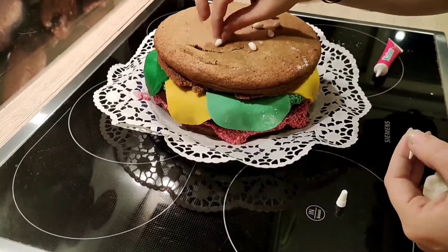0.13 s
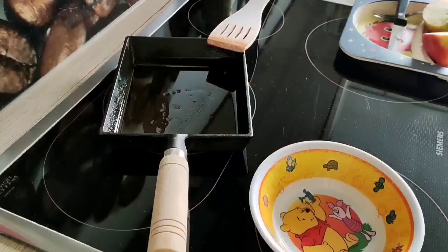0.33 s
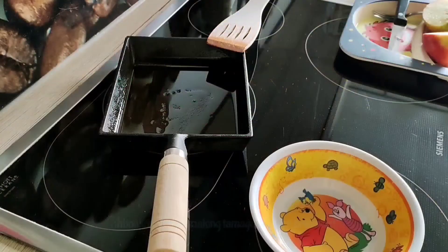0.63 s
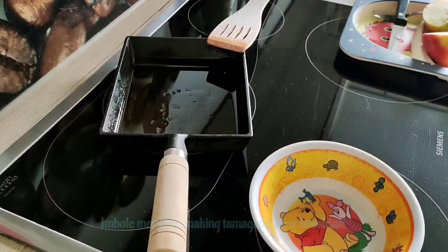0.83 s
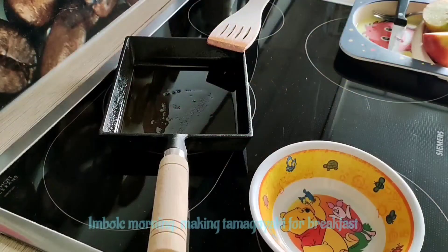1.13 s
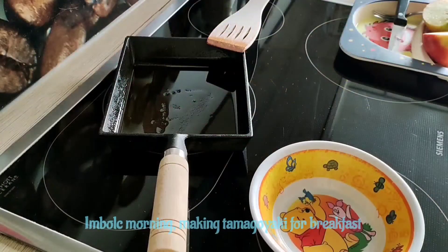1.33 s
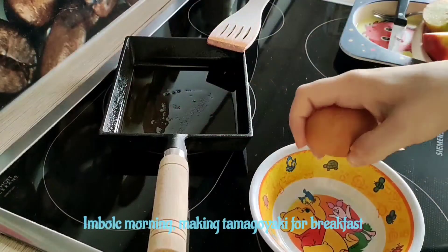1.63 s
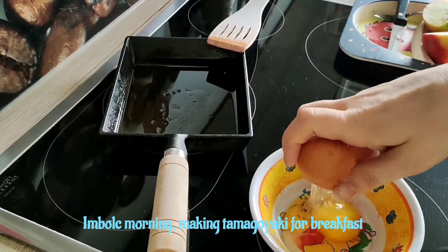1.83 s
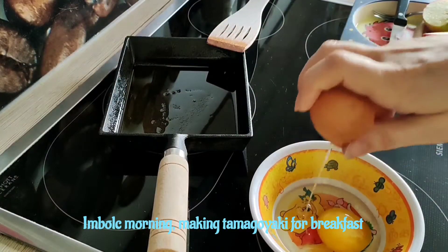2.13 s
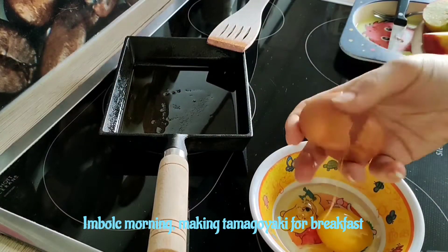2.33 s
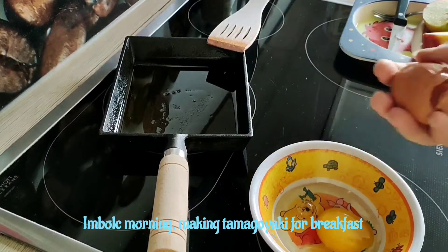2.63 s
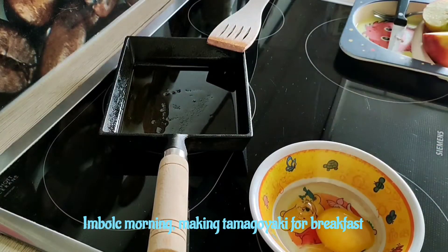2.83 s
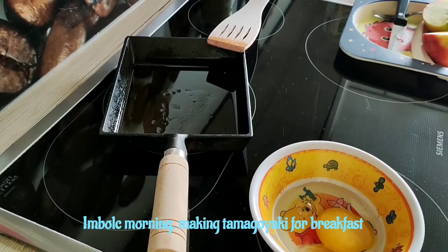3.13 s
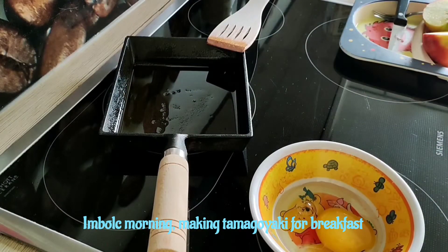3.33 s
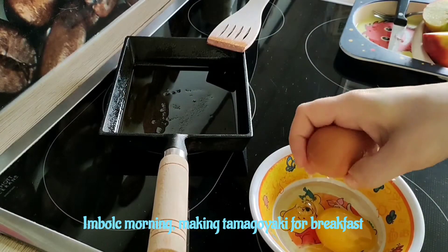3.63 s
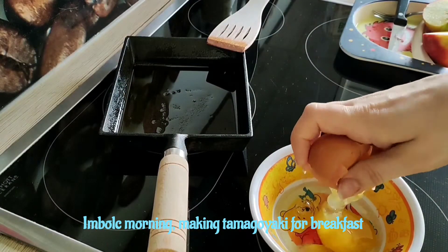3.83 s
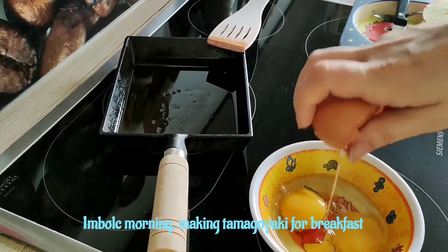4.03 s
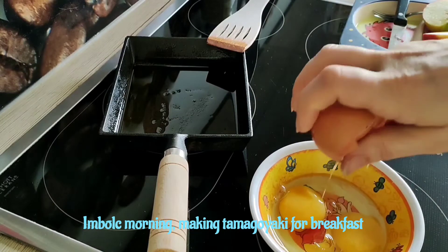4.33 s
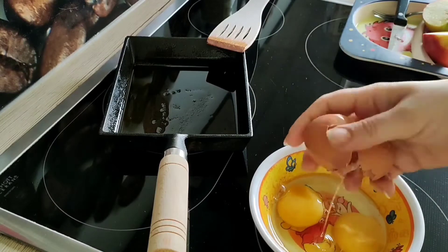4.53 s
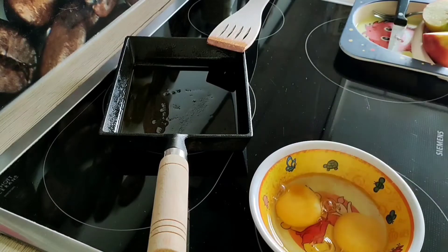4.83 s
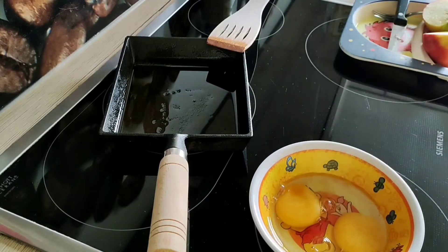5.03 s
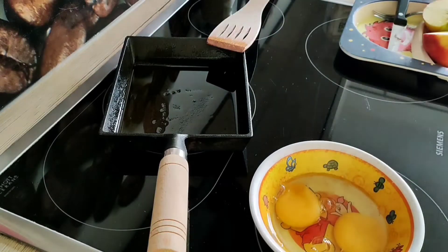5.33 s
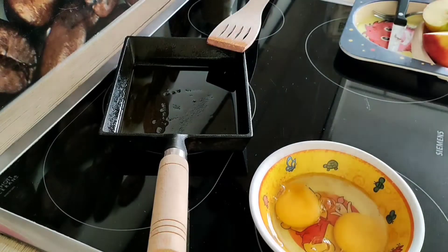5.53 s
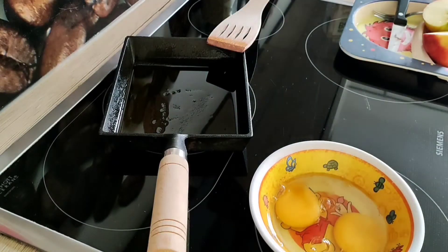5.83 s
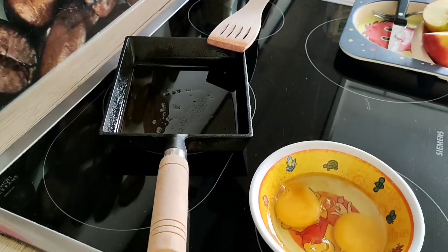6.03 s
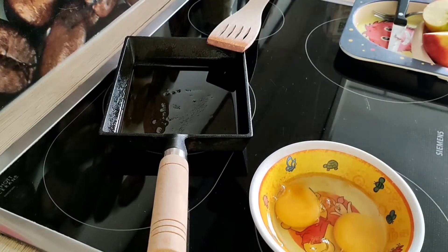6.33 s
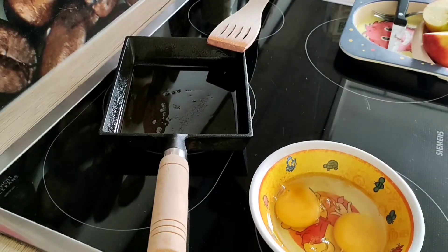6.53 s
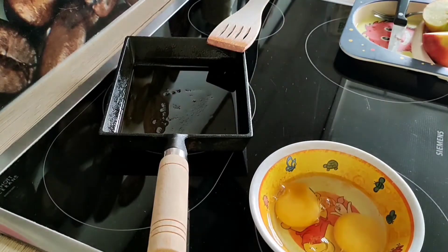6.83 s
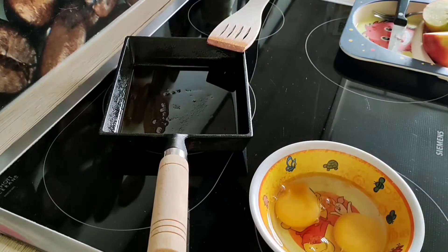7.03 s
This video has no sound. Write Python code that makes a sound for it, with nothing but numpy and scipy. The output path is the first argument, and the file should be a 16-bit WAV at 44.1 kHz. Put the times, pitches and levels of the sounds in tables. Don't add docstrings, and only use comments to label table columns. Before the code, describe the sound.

After a moment of silence, faint room air and soft movement, a first egg cracks with short hollow snaps, then a second after a bright ceramic knock. Rapid rattling and thumping of cupboard panels, door and shelf follows, with a mellow dish clink and a brief bright water spray. Close stereo pickup in a small kitchen; the accelerated action makes everything swell and stop abruptly, with hardly any tails.

```python
import sys
import numpy as np
from scipy import signal
from scipy.fft import rfft, irfft, next_fast_len
from scipy.io import wavfile
from scipy.ndimage import uniform_filter1d

SR = 44100
rng = np.random.default_rng(int(sys.argv[2]) if len(sys.argv) > 2 else 0)


def nominal_scale(level):
    x = np.asarray(level, float) / 20
    return 10 ** x


def transcribe(u):
    v = np.clip(np.atleast_2d(u).T, -1, 1)
    q = np.round(v * 32767).astype(np.int16)
    wavfile.write(sys.argv[1], SR, q)


N = 316108
LONG = next_fast_len(N)
HZ = np.fft.rfftfreq(LONG, 1 / SR)
TIME = np.arange(N) / SR


def evened(x):
    return x / np.sqrt(np.mean(x ** 2) + 1e-20)


def read(points):
    f, value = np.transpose(points)
    return np.interp(np.log(HZ + 1), np.log(f + 1), value)


def curve(points):
    s, db = np.transpose(points)
    return nominal_scale(np.interp(TIME, s, db, left=-120, right=-120))


def modes(table, bottom_hz=8, steep=1.41):
    peaks = sum(nominal_scale(2 * db) / (1 + (2 * (HZ - f) / width_hz) ** 2) ** steep for f, width_hz, db in table)
    return np.sqrt(peaks) * HZ ** 2 / (HZ ** 2 + bottom_hz ** 2)


def noise(gain, lo_hz, hi_hz):
    # (f/Hz, correlation)
    likeness = [(10, -0.084), (80, 0.95), (250, 0.81), (550, 0.52), (1400, -0.22), (3000, 0.053)]
    first, other = rfft(rng.standard_normal((2, LONG)))
    same = np.clip(read(likeness), -1, 1)
    spectra = gain * np.array([first, same * first + np.sqrt(1 - same ** 2) * other])
    band = (HZ > lo_hz) & (HZ < hi_hz)
    return irfft(spectra, LONG)[:, :N] * LONG / np.sqrt((abs(spectra[:, band]) ** 2).sum())


def patchy(x, patchy_db, bins=3, frames=6):
    z = signal.stft(x, nperseg=1024)[2]
    blobs = uniform_filter1d(rng.standard_normal(z.shape[1:]), bins, 0)
    blobs = uniform_filter1d(blobs, frames // 2, 1)
    y = signal.istft(z * nominal_scale(patchy_db * evened(blobs)), nperseg=1024)[1][:, :N]
    return evened(y) * np.std(x)


def swells(s, db, rise_ms, fall_ms, shape=2.4):
    coarse = TIME[::32]
    gap_ms = 1000 * (coarse - s[:, None])
    reach = np.where(gap_ms < 0, -gap_ms / rise_ms[:, None], gap_ms / fall_ms[:, None])
    loss_db = np.minimum(6 * reach ** shape, 8.5 * reach)
    gain = np.sqrt((nominal_scale(db[:, None] - np.minimum(loss_db, 150)) ** 2).sum(0))
    return np.interp(TIME, coarse, gain)


def grit(per_s, spread_db, ms):
    size = (rng.random(N) < per_s / SR) * nominal_scale(spread_db * np.minimum(rng.exponential(1, N), 4))
    t_ms = TIME[:1500] * 1000
    grain = np.exp(-t_ms / ms) - np.exp(-t_ms * 6 / ms)
    return evened(0.81 + evened(signal.oaconvolve(size, grain)[:N]))


def sides(pan_db):
    return nominal_scale(np.array([[.5], [-.5]]) * pan_db)


def add(mix, s, sound):
    part = mix[:, round(s * SR):][:, :sound.shape[1]]
    part += sound[:, :part.shape[1]]


def room_air():
    # (t/s, level/dB)
    drift = [(.33, -76), (.6, -70), (.8, -76.5), (1.2, -65), (1.4, -76), (2.1, -75), (2.6, -68),
             (3.15, -73.5), (3.5, -71), (4.1, -70), (5.0, -66), (6.5, -70), (6.75, -67), (6.95, -61),
             (7.17, -69)]
    # (f/Hz, level/dB per Hz)
    air_colour = [(100, -7.5), (400, -1.5), (750, -12.5), (3000, -15.5), (5400, -20.5), (13200, -25),
                  (15000, -21)]
    return patchy(noise(nominal_scale(read(air_colour)), 3200, 14700), 3.5) * curve(drift)


def far_clatter():
    # (t/s, level/dB, rise/ms, fall/ms)
    bursts = [
        (.5, -72, 110, 65),
        (.81, -70.5, 25, 220),
        (1.2, -71, 97, 90),
        (2.8, -71, 30, 18),
        (3.22, -66, 23, 25),
        (3.265, -49.5, 11, 12),
        (3.975, -45, 7.7, 17),
        (4.165, -56, 8.2, 14),
        (4.05, -80, 35, 520),
    ]
    # (f/Hz, width/Hz, level/dB)
    hard_things = [(2900, 320, 4.5), (3340, 640, -1), (1900, 360, -4)]
    level = nominal_scale(-79) + swells(*np.transpose(bursts))
    return patchy(noise(modes(hard_things), 1500, 5100), 3) * level * grit(40, 1.5, 5.3)


def stir():
    # (t/s, level/dB, rise/ms, fall/ms)
    moves = [(0.443, -55.5, 74, 65), (0.514, -51, 5, 7.2), (0.592, -50.5, 23, 11), (0.921, -59, 84, 5.7),
             (0.946, -57, 34, 37), (1.056, -50.5, 18, 9.2), (1.657, -58, 190, 9.1), (1.701, -47.5, 22, 16),
             (1.781, -48.5, 20, 21), (1.86, -62.5, 140, 40), (1.942, -53.5, 20, 14), (1.979, -47, 6, 13),
             (2.236, -62.5, 21, 58), (2.42, -62, 69, 35), (2.58, -51.5, 5.1, 30), (2.679, -54, 9.6, 14),
             (2.737, -50.5, 24, 16), (2.785, -53.5, 19, 19), (3.004, -59, 86, 88), (3.3, -53.5, 9.6, 13),
             (3.635, -57, 29, 47), (3.883, -59, 63, 9.2)]
    # (f/Hz, width/Hz, level/dB)
    room = [(203, 51, 0), (264, 29, -1.5), (412.4, 63, 6), (610, 250, -12), (1230, 3400, -22)]
    return patchy(noise(modes(room, bottom_hz=121.0), 120, 850), 1.5) * swells(*np.transpose(moves))


def rustle():
    # (t/s, level/dB, rise/ms, hollow body/dB)
    rubs = [(.55, -67, 4, -1), (1.055, -70.5, 7, 9), (1.121, -50, 12, 5), (1.329, -33.5, 12.3, 2.5),
            (1.57, -64, 62, 0), (1.66, -56, 48, -4), (1.703, -44, 14, -6), (1.737, -41, 22, 1),
            (1.983, -65.5, 96, 7.5), (2.238, -53.5, 21, 1), (2.423, -41, 23, 7.5), (2.58, -54, 8.9, 5),
            (2.676, -60.5, 10.5, 10.5), (2.908, -53, 9.9, 0), (2.972, -62, 10.7, 18), (3.003, -56.5, 13, 7),
            (3.26, -69.5, 8.8, 17), (3.369, -29.5, 1.7, 7), (3.55, -53, 9.3, -6), (3.582, -35, 9.8, -3),
            (3.702, -41.5, 25, -7.5), (3.822, -46, 10, -12), (3.855, -49.5, 5.5, -11), (3.975, -51, 11, 3),
            (4.17, -63, 6.6, 8), (4.465, -56, 75, -7), (4.497, -41.5, 13.4, 2), (4.616, -40, 11.5, 2.5),
            (4.841, -45.5, 11, -1), (5.278, -33, 15.5, 7), (6.418, -56, 15, 9.5), (6.487, -55, 12, -4)]
    # (f/Hz, level/dB per Hz)
    crisp_colour = [(1760, -21), (3000, 4), (4940, -2), (7550, 1.5), (12100, -7.5), (14000, -5),
                    (15000, -18)]
    # (f/Hz, width/Hz, level/dB)
    shell_halves = [(1600, 1750, 3), (2350, 820, 0.5), (3420, 700, -20)]
    s, db, rise, body_db = np.transpose(rubs)
    fall = 12.54 + 2.3 * np.maximum(-59.5 - db, 0)
    crisp = patchy(noise(nominal_scale(read(crisp_colour)), 4100, 15600), 2.5) * grit(1300, 1.8, 2.9)
    crisp = crisp * sides(-5) * swells(s, db - 1.5, 0.74 * rise, 1.04 * fall, shape=1.0)
    body = patchy(noise(modes(shell_halves, bottom_hz=1010), 1050, 3800), 3) * grit(800, 4.4, 2.8)
    body = body * swells(s, db + 1.5 + body_db, 0.59 * rise, 0.9 * fall, shape=1.0)
    return crisp + body


def bumps():
    # (t/s, level/dB, rise/ms, fall/ms, thud over sway/dB)
    knocks = [
        (.57, -62, 40, 14, 8),
        (1.13, -34, 16, 17, -3),
        (1.22, -42, 57, 62, -14),
        (1.33, -54.5, 15, 15, 6),
        (1.055, -61, 12, 15, 14),
        (1.99, -66, 21, 15, 7),
        (2.42, -72, 24, 26, 0),
        (3.38, -52, 26, 20, -20),
        (5.27, -63.5, 30, 41, 17),
    ]
    s, db, rise, fall, thud_db = np.transpose(knocks)
    sway = noise(modes([(21.6, 9.0, 0)], bottom_hz=5.0), 11, 76)
    sway = sway * (nominal_scale(-71) + swells(s, db, rise, fall))
    thud = noise(modes([(102.0, 7.0, 0)]), 57.7, 130)
    return sway + thud * swells(s, db + thud_db, 0.91 * rise, 0.63 * fall)


def strokes():
    # (t/s, level/dB, rise/ms, door over panels/dB)
    rummaging = [(3.975, -44.5, 9.1, -2), (4.011, -40.5, 26, -4), (4.204, -34, 20, -4), (4.365, -31, 28, 6),
                 (4.463, -38.5, 46, 4), (4.557, -39.5, 180, -3.5), (4.7, -36.5, 55, 0),
                 (4.79, -33, 21.5, -1.5), (4.887, -36.5, 46, -2.5), (5.025, -35, 22, 5), (5.27, -31, 39, 4),
                 (5.347, -40.5, 130, 2.5), (5.398, -34.5, 11, -1), (5.513, -32.5, 12, 4.5),
                 (5.559, -44, 19, 5), (5.588, -42, 9.5, 4), (5.678, -38.5, 48, 4.5), (6.436, -41.5, 25, 3),
                 (6.485, -38, 47, 7), (6.605, -47, 38, -6), (6.653, -36.5, 14, -9), (6.717, -42, 28, -4),
                 (6.835, -42.5, 16, -4), (6.884, -36, 12.6, -1.5), (7.087, -35.5, 11, 2)]
    # (t/s, level/dB, rise/ms, shelf modes/dB, door over panels/dB)
    handling = [
        (1.128, -36.5, 13, -26, -12),
        (1.189, -40.5, 38, -19, -8),
        (1.33, -35, 27, -9, -3),
        (3.261, -46, 6, -23.5, -10),
        (3.348, -36.5, 16, -15, 2),
        (3.385, -31, 33, -4, 2),
        (3.665, -51, 17, 4.5, 8),
        (3.79, -36, 54, -7.5, 1),
    ]
    # (t/s, level/dB, rise/ms, fall/ms)
    drags = [(4.075, -42, 47, 31), (4.257, -44, 38, 220), (4.602, -44, 17.9, 65), (4.959, -45, 110, 49),
             (5.085, -42.5, 11, 41), (5.158, -42, 28, 15), (5.446, -47, 49, 41), (5.724, -37.5, 21, 47),
             (5.876, -37.5, 74, 58), (6.001, -38, 24, 41), (6.17, -40, 84, 47), (6.292, -41, 140, 75),
             (6.527, -43.5, 17, 21), (6.787, -45.5, 15, 15), (6.924, -41, 16, 30), (7.035, -41, 50, 47),
             (7.14, -45, 16, 28)]
    # (t/s, shelf modes/dB)
    nearness = [
        (4.0, -8.5),
        (4.6, -7),
        (4.7, -4.5),
        (5.3, -7),
        (6.3, -5),
        (7.1, -8),
    ]

    def shelf_at(s):
        return np.interp(s, *np.transpose(nearness))

    knocks = handling + [(s, db, rise, shelf_at(s), door_db) for s, db, rise, door_db in rummaging]
    rows = [(s, db, rise, min(0.53 * rise, 10.4), shelf_db, door_db) for s, db, rise, shelf_db, door_db in knocks]
    return rows + [(s, db, rise, fall, shelf_at(s), 0) for s, db, rise, fall in drags]


def raps(table, db_trim, rise_ms, hold_s, apart):
    out, t = np.zeros((2, N)), TIME[:3500]
    rise = np.sin(np.pi / 2 * np.minimum(1000 * t / rise_ms, 1)) ** 2
    loss_db = 8.5 * (np.maximum(t - rise_ms / 2000, 0) / hold_s) ** 1.1
    for s, db, hz in table:
        wander = np.cumsum(rng.standard_normal((2, len(t))), 1) * 0.00054 * np.sqrt(hz)
        turn = 2 * np.pi * (hz * t + rng.random()) + wander + apart * rng.standard_normal((2, 1))
        add(out, s, np.sin(turn) * nominal_scale(db + db_trim - loss_db) * rise)
    return out


def rummage():
    # (f/Hz, width/Hz, level/dB)
    panel_modes = [(250, 195, -1.5), (407.6, 34, 0), (149, 37, -2), (108, 13, -25.5)]
    door_modes = [(737.4, 120, 5), (617, 27, 3), (858, 11, 4)]
    shelf_modes = [(1292, 105, 8.5), (1548, 250, 4.5), (2310, 290, 5), (2740, 270, -3.5), (3450, 590, -14)]
    # (t/s, peak level/dB, ring f/Hz)
    door_raps = [(3.583, -36, 584), (3.714, -42.5, 604), (3.765, -38, 740), (3.786, -31, 711),
                 (3.961, -49, 657), (4.013, -34, 666), (4.182, -31, 720), (4.206, -29.5, 719),
                 (4.319, -34.5, 657), (4.342, -27.5, 718), (4.428, -33, 710), (4.494, -37, 656),
                 (4.554, -34.5, 610), (4.694, -33, 720), (4.772, -46, 770), (4.784, -31.5, 669),
                 (4.818, -38.5, 750), (4.853, -39, 854), (4.873, -35, 790), (5.02, -27, 763),
                 (5.077, -36.5, 696), (5.152, -40, 710), (5.179, -36.5, 737), (5.235, -34, 786),
                 (5.268, -30, 604), (5.392, -35, 857), (5.471, -41.5, 720), (5.503, -38, 688),
                 (5.517, -45, 782), (5.556, -49, 750), (5.585, -35, 742), (5.636, -41, 767),
                 (5.669, -31.5, 762), (5.721, -34, 720), (5.807, -34, 786), (5.819, -33, 1010),
                 (5.833, -31, 1040), (5.859, -34, 771), (5.995, -36, 770), (6.142, -38, 743),
                 (6.16, -33, 723), (6.252, -39, 880), (6.431, -39, 813), (6.459, -39, 725),
                 (6.589, -38, 617), (6.641, -36, 773), (6.695, -38, 770), (6.818, -49, 680),
                 (6.966, -43, 760), (7.007, -39.5, 777), (7.126, -40, 668)]
    panel_raps = [(2.661, -62, 404), (2.766, -39.5, 205), (3.254, -37, 409), (3.344, -28.5, 326),
                  (3.369, -25.5, 223), (3.578, -36.5, 469), (3.769, -35.5, 398), (3.99, -42, 133),
                  (3.992, -32.5, 301), (4.178, -28.5, 241), (4.33, -34, 253), (4.4, -39, 214),
                  (4.593, -30.5, 245), (4.781, -29.5, 216), (4.879, -29, 435), (5.015, -28.5, 400),
                  (5.08, -36.5, 317), (5.152, -37, 321), (5.228, -39, 369), (5.263, -29.5, 326),
                  (5.393, -31.5, 364), (5.504, -35.5, 400), (5.666, -35.5, 402), (5.715, -34, 211),
                  (5.81, -35, 160), (5.931, -33.5, 177), (6.017, -32, 272), (6.102, -35.5, 165),
                  (6.227, -38, 383), (6.415, -34, 386), (6.456, -33.5, 390), (6.479, -33, 218),
                  (6.521, -36.5, 396), (6.637, -28, 429), (6.689, -37, 416), (6.781, -34, 402),
                  (6.871, -37, 399), (6.977, -34, 424), (7.026, -29.5, 426)]
    shelf_raps = [(3.7557, -39, 2266), (3.9687, -39, 2410), (4.1837, -28.5, 2210), (4.212, -33, 2350),
                  (4.2735, -42, 2310), (4.3184, -41, 1290), (4.3444, -31, 2350), (4.4142, -40, 1260),
                  (4.4636, -37, 2120), (4.4925, -34, 1630), (4.548, -39, 2400), (4.5953, -40, 2535),
                  (4.6138, -29, 1476), (4.7659, -41, 2260), (4.7824, -27, 2306), (4.8348, -36, 1440),
                  (4.8866, -35, 1290), (5.0193, -39, 1350), (5.0797, -39, 1280), (5.1505, -39, 2380),
                  (5.2309, -41, 2270), (5.2678, -14.5, 2480), (5.3471, -42, 2235), (5.3865, -40, 2307),
                  (5.5067, -34.5, 1320), (5.5865, -37, 1330), (5.6704, -35, 2260), (5.7192, -37, 2350),
                  (5.9457, -33, 2740), (6.0146, -35, 2324), (6.4586, -41, 2400), (6.478, -43, 3060),
                  (6.5209, -37, 1380), (6.543, -39, 1370), (6.638, -45, 2180), (6.691, -42, 1350),
                  (6.7125, -45, 1310), (6.7833, -45, 2560), (6.8267, -41, 2350), (6.8716, -39, 2235),
                  (6.92, -36.5, 1540), (7.0851, -42, 2390)]
    s, db, rise, fall, shelf_db, door_db = np.transpose(strokes())
    door_share = 1 / (1 + nominal_scale(-2 * door_db))
    panels = patchy(noise(modes(panel_modes, bottom_hz=72, steep=1.22), 73, 630), 1.97)
    panels = panels * swells(s, db + 10 * np.log10(1 - door_share), 0.97 * rise, 1.68 * fall)
    door = noise(modes(door_modes, steep=1.35), 360, 1000)
    door = door * swells(s, db + 10 * np.log10(door_share), 0.77 * rise, 1.73 * fall)
    shelf_level = db + shelf_db - 0.03 * (db + 34.0) * (s > 4.0)
    shelf = patchy(noise(modes(shelf_modes, bottom_hz=890, steep=1.26), 980, 3200), 3.2)
    shelf = shelf * swells(s, shelf_level, 0.84 * rise, 1.4 * fall)
    rings = raps(door_raps, -1.7, 6.2, 0.014, 0.8)
    rings = rings + raps(panel_raps, -6, 5.7, 0.017, 0.18)
    rings = rings + raps(shelf_raps, -7.5, 4.4, 0.014, 0.99)
    wood = grit(200, 1.0, 7.4) * (nominal_scale(-3.0) * panels + nominal_scale(-4.0) * door)
    return wood + nominal_scale(-2.5) * grit(200, 0.73, 5.6) * shelf + rings


def snaps():
    # (t/s, peak level/dB, ring f/Hz, crack/dB)
    breaks = [(1.5478, -40.5, 1930, -10), (1.6988, -21.5, 3740, -12), (1.702, -27, 3600, -9),
              (1.7448, -24, 1980, -5), (1.7475, -16.5, 2100, -4), (1.7644, -19.5, 1840, -8),
              (1.979, -36.5, 1750, -11), (1.9916, -33.5, 1870, -26), (2.128, -39.5, 1900, -32),
              (2.1806, -41.5, 1970, -25), (2.3595, -38.5, 1860, -18), (2.38, -31, 1800, -20),
              (2.383, -32, 1900, -18.5), (2.396, -22, 1670, -7), (2.4189, -19.5, 1880, 0),
              (2.4223, -5, 2005, -2.5), (2.4246, -11, 2780, -11), (2.426, -18.5, 1500, 3),
              (2.4321, -28, 1440, -5), (2.436, -29, 1380, -9), (2.578, -32, 1520, 7),
              (2.9725, -31, 1460, -32), (2.994, -32, 1470, -34), (2.9993, -24.5, 1540, -38),
              (3.0045, -23, 1550, -23), (3.0094, -36, 1450, -29), (3.013, -33, 1420, -25),
              (3.3647, -14.5, 2100, 3.5), (3.536, -36, 2400, -8), (3.5819, -14.5, 2350, -1),
              (3.653, -29.5, 1900, -7), (4.461, -26.5, 2140, -7), (4.4927, -26.5, 1590, -23),
              (4.5054, -26, 2900, -20), (4.6137, -20.5, 2600, -19), (4.836, -36, 3900, 0)]
    # (t/s, peak level/dB, ring f/Hz, crack/dB)
    splinters = [(1.322, -30.5, 956, -9), (2.972, -35, 2800, -30), (3.002, -32, 3000, -30),
                 (3.006, -36, 4180, -30), (3.5365, -37, 5000, -6), (3.7549, -32, 8200, -4),
                 (3.7812, -31, 5760, -2), (3.8246, -25, 6700, -3), (3.8508, -30, 7560, -1),
                 (4.157, -41, 3100, -30), (4.184, -42, 2900, -20)]
    centre_hz = 2100
    out, t = np.zeros((2, N)), TIME[:1800]
    treble = signal.butter(1, [6200, 10500], "band", fs=SR)
    middle = signal.butter(2, [1400, 3900], "band", fs=SR)
    onset = 1 - np.exp(-t / 0.00039)
    for s, db, hz, crack_db in breaks + splinters:
        t60 = 20.4 / hz
        pan_db = max(-18 * np.log2(hz / centre_hz), -14.5)
        jitter = np.cumsum(rng.standard_normal((2, len(t))), 1) * 0.0366
        turn = 2 * np.pi * hz * t * (1 - 3.4 * t) + jitter + [[0], [.9]]
        step = evened(signal.lfilter(*middle, rng.standard_normal((2, len(t))))) * nominal_scale(-60 * t / 0.015)
        step_share = min(0.24, 0.24 * (centre_hz / hz) ** 2)
        ring = np.sin(turn) * nominal_scale(-60 * t / t60) + step_share * step
        crack = signal.lfilter(*treble, rng.standard_normal((2, len(t))))
        crack = crack * (nominal_scale(-60 * t / 0.008) + 0.24 * nominal_scale(-60 * t / 0.072))
        add(out, s, nominal_scale(db - 0.5) * onset * (ring * sides(pan_db) + 0.99 * nominal_scale(crack_db) * crack))
    return out


def clinks():
    # (t/s, blow level/dB, ringing slice/s)
    blows = [
        (3.367, -27.5, 0.041),
        (5.266, -22, 0.028),
    ]
    # (f/Hz, level/dB, t60/s)
    dishes = [
        [(2260, -6, 0.14), (7700, 0, 0.054), (8260, -0.5, 0.099), (8900, -16, .06), (1060, 0, 0.069),
         (2880, -15, 0.11)],
        [(2073, 1.5, 0.1), (2600, -17, 0.078), (3230, -13, 0.086), (3000, -1, 0.2), (586, -1, 0.022)],
    ]
    out, t = np.zeros((2, N)), TIME[:3000]
    onset = 1 - np.exp(-t / 0.00024)
    for (s, db, slice_s), dish in zip(blows, dishes):
        fade = np.exp(-(t / slice_s) ** 2) * onset
        for hz, mode_db, t60 in dish:
            tremble = 1 + evened(uniform_filter1d(rng.standard_normal((2, len(t))), 150))
            ring = tremble * np.sin(2 * np.pi * (hz * t + rng.random() + np.array([[0], [.22]])))
            add(out, s, ring * nominal_scale(db + mode_db - 60 * t / t60) * fade)
    return out


def tap():
    # (t/s, level/dB)
    flow = [
        (5.68, -83),
        (5.715, -47),
        (5.75, -41),
        (6.3, -40.5),
        (6.345, -47.5),
        (6.39, -60.5),
        (6.45, -72),
    ]
    # (f/Hz, level/dB per Hz)
    spray_colour = [(530, -15), (900, -7), (1310, -13), (2890, -6), (3700, -9.5), (12300, -15.5),
                    (14200, -22.5), (14500, -53)]
    return patchy(noise(nominal_scale(read(spray_colour)), 3350, 14000), 1.5) * curve(flow) * grit(2800, 2, 1)


def scene():
    background = room_air() + far_clatter() + stir()
    eggs = rustle() + snaps()
    return background + eggs + bumps() + rummage() + clinks() + tap()


def low_pass(x):
    return signal.sosfilt(signal.butter(12, 16470, fs=SR, output="sos"), x)


def record(dry):
    start_s, fade_s = 0.322, 0.022
    opened = dry * np.clip((TIME - start_s) / fade_s, 0, 1) ** 2
    band_limit = signal.firwin(121, 14330, window=("kaiser", 4), fs=SR)
    limited = signal.oaconvolve(opened, band_limit[None], "same")
    leak_limit = signal.firwin(255, 15700, fs=SR)
    above = signal.oaconvolve(opened - limited, leak_limit[None], "same")
    power = abs(uniform_filter1d((above ** 2).mean(0), 2048))
    leak = nominal_scale(-13) * above * power ** 2 / (power ** 2 + nominal_scale(4.4 * -61))
    return low_pass(limited + leak)


dry = scene()
out = record(dry)
transcribe(out)
```